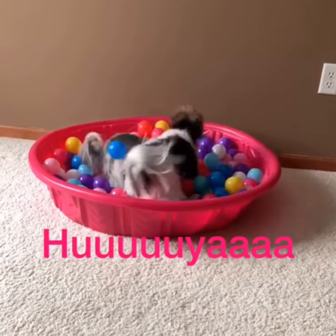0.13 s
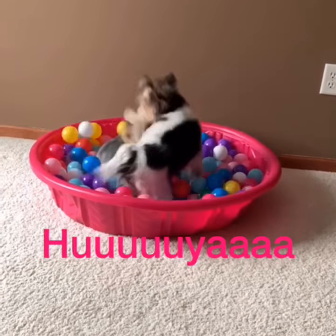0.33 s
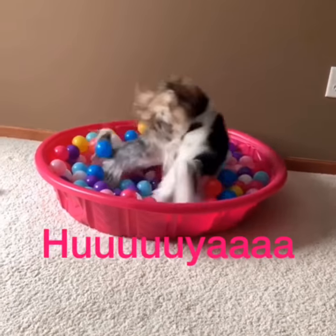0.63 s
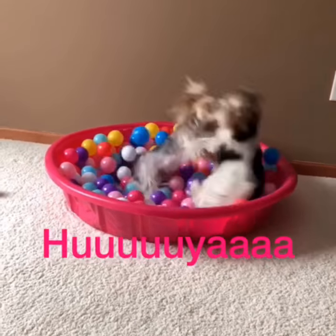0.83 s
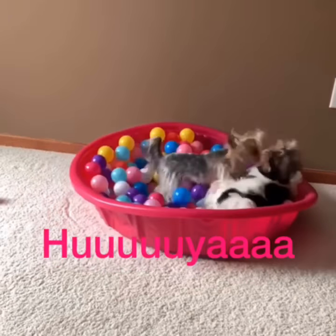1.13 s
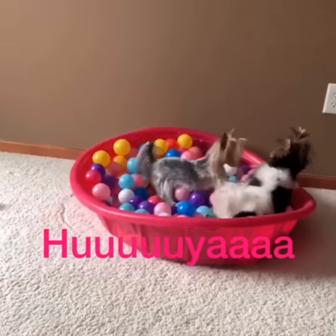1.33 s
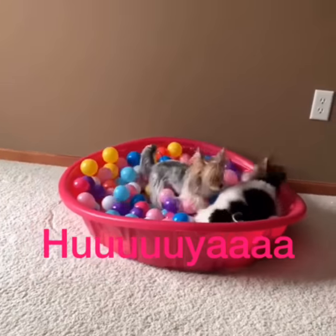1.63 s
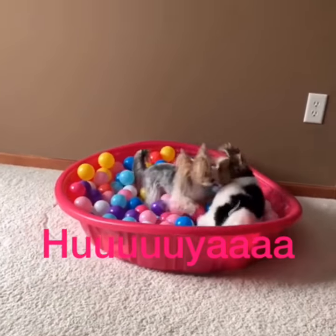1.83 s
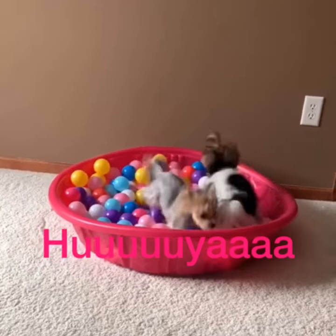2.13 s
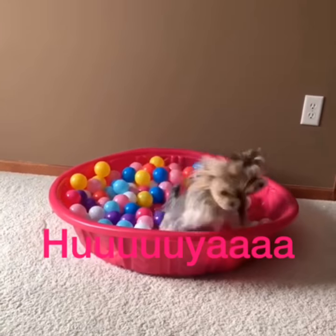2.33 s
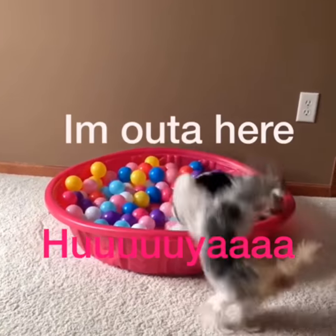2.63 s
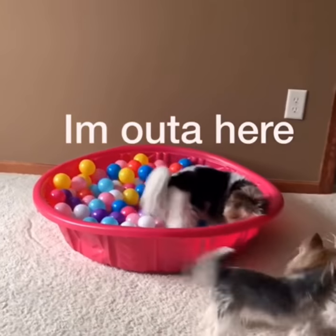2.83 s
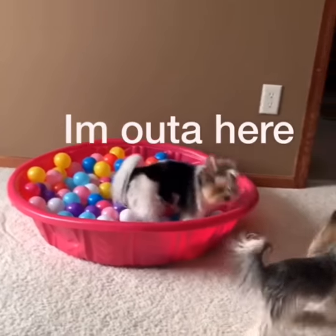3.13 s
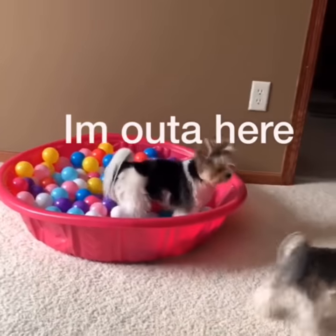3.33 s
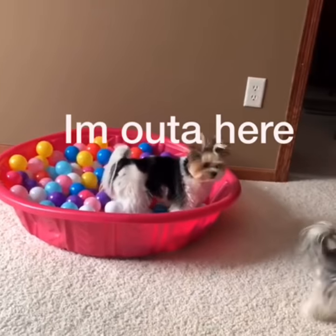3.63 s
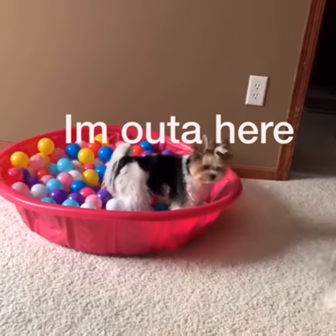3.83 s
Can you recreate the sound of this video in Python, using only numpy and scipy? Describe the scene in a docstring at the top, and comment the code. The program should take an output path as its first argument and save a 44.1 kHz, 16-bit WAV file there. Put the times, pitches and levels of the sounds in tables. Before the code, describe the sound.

Hollow plastic balls clatter and drum in a thin plastic tub as two small dogs wrestle.

```python
"""Two small dogs in a ball pool

Two small dogs wrestle in a thin plastic paddling pool full of hollow plastic balls, in a carpeted room.
Shoved balls drum on the tub, clatter, roll and rustle: many random contacts set resonators ringing.
Thumps and single ball knocks are short dying tones; claw cracks and a dog's wheeze are shaped noise.
One dog jumps out and the balls settle, and quiet background noise remains."""
import sys
import numpy as np
from scipy import signal
from scipy.fft import rfft, irfft
from scipy.io import wavfile

SR = 44100
rng = np.random.default_rng(int(sys.argv[2]) if len(sys.argv) > 2 else 0)


def unload_wav(signal):
    """Save mono or channel-first audio to the path in sys.argv[1] as 16-bit WAV at rate SR, clipped to [-1, 1]."""
    wavfile.write(
        sys.argv[1],
        SR,
        np.round(np.clip(np.atleast_2d(signal).T, -1, 1) * 32767).astype(np.int16),
    )


N = 176400   # length of the sound, in samples


def amp(db):
    """Turn decibels into a plain multiplier."""
    return 10 ** (np.asarray(db) / 20)


def rms_one(x):
    """Scale a signal to an average (rms) level of 1."""
    return x / np.sqrt(np.mean(x ** 2) + 1e-20)


def in_time(rows):
    """Join the rows of a timed table with straight lines, one curve per column."""
    s, *columns = np.transpose(rows)
    return [np.interp(np.arange(N) / SR, s, c) for c in columns]


def at_hz(points, hz):
    """Read a spectrum table at any frequency."""
    table_hz, table_db = np.array(points).T
    return np.interp(np.log(hz), np.log(table_hz), table_db)


def drift(rate_hz):
    """Smooth random wandering of spread 1, mostly slower than the given rate."""
    r = np.exp(-80 * np.pi * rate_hz / SR)
    # worked out at every 40th sample; the first 2000 values let the filter settle
    noise = rng.standard_normal(N // 40 + 2002)
    slow = signal.lfilter([1], [1, -2 * r, r * r], noise)[2000:]
    return np.interp(np.arange(N) / 40, np.arange(len(slow)), rms_one(slow))


def ring(clicks, hz, t60):
    """Each unit click sets a sine ringing, which falls by 60 dB in t60 seconds."""
    r = 10 ** (-3 / (t60 * SR))
    w = 2 * np.pi * hz / SR
    return signal.lfilter([0, np.sin(w)], [1, -2 * r * np.cos(w), r * r], clicks + 1e-18)


def coloured(spectrum):
    """Noise with the given spectrum, rms 1."""
    hz = np.maximum(np.arange(N // 2 + 1) * SR / N, 1)
    return rms_one(irfft(rfft(rng.standard_normal(N)) * amp(at_hz(spectrum, hz)), N))


def narrow_noise(hz, width_hz):
    """Noise band round a centre that may move; rms 1."""
    low_pass = signal.butter(2, width_hz / 2, fs=SR, output="sos")
    slow = signal.sosfilt(low_pass, rng.standard_normal((2, N)))
    phase = 2 * np.pi * np.cumsum(hz * np.ones(N)) / SR
    return rms_one(slow[0] * np.cos(phase) + slow[1] * np.sin(phase))


def collisions(spectrum, low_hz, high_hz, per_s, cycles, uneven_db, surge_db, count):
    """Random, uneven, soft contacts dealt out to resonators spread from low to high; rms 1."""
    sizes = amp(uneven_db * np.minimum(rng.exponential(1, N), 5)) * rng.choice([-1, 1], N)
    happens = rng.random(N) < per_s / SR
    clicks = sizes * happens * amp(surge_db * drift(5.1))
    dealt = rng.integers(0, count, N)
    total = np.zeros(N)
    for k, hz in enumerate(np.geomspace(low_hz, high_hz, count)):
        # ringing twice makes each contact start softly
        soft = ring(clicks * (dealt == k), hz, cycles / hz)
        tone = rms_one(ring(soft, hz, cycles / hz / 2))
        # sqrt(hz): higher resonators each cover a wider band
        total += amp(at_hz(spectrum, hz)) * np.sqrt(hz) * tone
    return rms_one(total)


def strike(out, s, sound):
    """Add a sound at a time in seconds."""
    return out + np.pad(sound, (int(s * SR), N))[:N]


# How hard the balls are churned:
# (time [s], tub drumming level [dB], ball clatter level [dB], ball rolling level [dB], rustle level [dB])
CHURN = [(0.0, -27, -34.5, -46, -49), (0.07, -21, -35, -48.5, -50.5), (0.17, -28.5, -44.5, -54.5, -56.5),
         (0.24, -31.5, -41.5, -48, -47.5), (0.32, -25, -34.5, -47, -48.5), (0.41, -21, -37.5, -47, -52.5),
         (0.56, -26, -33.5, -44.5, -47.5), (0.62, -29, -42, -44, -48.5), (0.67, -30.5, -42, -56, -59.5),
         (0.71, -38.5, -40.5, -51.5, -54), (0.8, -31, -49.5, -55.5, -57), (0.87, -20.5, -33, -44, -45.5),
         (0.97, -20, -35.5, -44, -47.5), (1.04, -24, -38.5, -44.5, -54), (1.12, -23.5, -38, -45.5, -50),
         (1.23, -34, -43.5, -51, -56.5), (1.38, -32, -47.5, -57.5, -64), (1.41, -44.5, -53.5, -50.5, -56),
         (1.46, -31, -40.5, -46, -55), (1.62, -32, -42, -51, -54.5), (1.82, -39, -52.5, -58, -61),
         (1.87, -39, -43, -40.5, -46.5), (1.9, -27, -42.5, -49, -55), (1.97, -39.5, -51, -55.5, -58.5),
         (2.09, -43, -53, -55.5, -62), (2.17, -37, -40.5, -48, -54), (2.23, -28.5, -43, -54, -53.5),
         (2.3, -28.5, -38, -48.5, -48.5), (2.42, -30.5, -50.5, -50, -54.5), (2.45, -29, -37, -47, -52.5),
         (2.56, -29.5, -42, -53.5, -55.5), (2.59, -23, -37, -49.5, -53), (2.66, -38, -57.5, -56, -67),
         (2.74, -35, -47, -55.5, -59.5), (2.85, -37, -50, -57.5, -63), (2.97, -49, -61.5, -66.5, -71.5),
         (3.18, -53.5, -65, -69, -80), (3.27, -57.5, -69, -70, -77.5), (3.33, -53, -77, -69.5, -83),
         (3.45, -76.5, -88, -79, -78), (3.64, -67, -81, -74, -74.5), (3.67, -54.5, -76, -72.5, -78.5),
         (3.8, -80, -94.5, -82, -84.5), (3.9, -76.5, -85.5, -78.5, -79.5), (3.97, -89, -87, -84, -81)]


def churn_levels():
    """The wrestling drives four sounds of the pool, each with its own level curve."""
    return in_time(CHURN)


# Response of the tub: (frequency [Hz], relative level per Hz [dB])
TUB_RESPONSE = [(32, -44), (55, -26), (113, 1), (178, -2), (239, 1.5), (386, -4), (427, -11), (489, -7),
                (585, -16.5), (800, -21), (1040, -50), (1760, -120)]


def tub_drumming(level_db):
    """Shoved balls hit the thin tub, which answers with low, short rings."""
    return amp(level_db) * collisions(TUB_RESPONSE, 63.6, 715, per_s=700, cycles=14.6,
                                      uneven_db=1.5, surge_db=.5, count=20)


# Spread of ball resonances: (frequency [Hz], relative level per Hz [dB])
BALL_RESONANCES = [(350, -31), (600, -2), (943, 0.5), (1240, 1.5), (1580, -4), (1690, 0.5), (2400, -19),
                   (3120, -43), (5280, -120)]


def ball_clatter(level_db):
    """Hollow balls knock together and their shells ring in the middle range."""
    return amp(level_db) * collisions(BALL_RESONANCES, 621, 2284, per_s=2500, cycles=20,
                                      uneven_db=2.8, surge_db=1.2, count=26)


# Colour of the rolling: (frequency [Hz], relative level per Hz [dB])
ROLLING_COLOUR = [(1120, -32), (1900, -9.5), (2200, -2.5), (2770, -7.5), (3760, -9), (4800, -16),
                  (6240, -52), (10600, -120)]


def ball_rolling(level_db):
    """Rolling balls make many nearly even contacts, higher than the clatter."""
    return amp(level_db) * collisions(ROLLING_COLOUR, 1910, 4510, per_s=1600, cycles=35.7,
                                      uneven_db=0.5, surge_db=2.04, count=12)


# Colour of the rustle: (frequency [Hz], relative level per Hz [dB])
RUSTLE_COLOUR = [(3060, -38), (5200, -0.5), (7300, 4.5), (10400, 1.5), (11400, -19), (11600, -65),
                 (13500, -13), (15800, 9)]


def rustle(level_db):
    """Shells and fur rub in thousands of tiny, high contacts a second."""
    return amp(level_db) * collisions(RUSTLE_COLOUR, 5500, 15400, per_s=8900, cycles=55,
                                      uneven_db=2.5, surge_db=1.2, count=22)


# Bodies and paws thump the tub: (time [s], peak level [dB], pitch [Hz])
THUMPS = [(0.041, -24, 125), (0.302, -15.5, 256), (0.559, -14.5, 213), (0.8, -18.5, 255), (1.01, -14, 242),
          (1.356, -25, 277), (1.453, -25, 336), (1.539, -43, 219), (1.902, -25, 107), (2.158, -19, 297),
          (2.603, -17, 222), (2.648, -21.5, 299), (2.826, -35.5, 148), (2.94, -39, 62), (3.036, -42.5, 117),
          (3.2, -54, 60), (3.305, -40, 317), (3.337, -46, 313), (3.36, -55, 54.7), (3.69, -52.5, 251),
          (3.751, -54, 239), (3.87, -63, 241)]


def thumps():
    """A soft blow makes a low tone that swells quickly and dies within a few cycles."""
    fall_cycles, rise_cycles = 8.1, 1.4   # to fall by 60 dB; time constant of the rise
    out, t = np.zeros(N), np.arange(SR // 4) / SR
    for s, db, hz in THUMPS:
        shape = amp(-60 * t * hz / fall_cycles) * (1 - np.exp(-t * hz / rise_cycles))
        out = strike(out, s, amp(db) * shape / shape.max() * np.sin(2 * np.pi * hz * t))
    return out


# Single balls knock: (time [s], peak level [dB], pitch [Hz], time for the scuff to fall by 60 dB [s])
BALL_KNOCKS = [(.064, -27, 632, 0.068), (.137, -46, 1540, .02), (0.168, -25, 1205, 0.012),
               (.222, -28, 1320, 0.019), (.469, -22, 552, 0.043), (.489, -23.5, 824, 0.059),
               (.49, -22.5, 2030, 0.021), (0.633, -34, 1790, .04), (0.689, -23, 1090, 0.065),
               (0.704, -32, 1470, 0.033), (.727, -20, 1136, 0.014), (.76, -33, 1230, .02),
               (0.843, -27, 970, .03), (.877, -21, 1210, 0.0081), (1.006, -22, 1474, 0.055),
               (1.019, -20.5, 4560, 0.018), (1.068, -35, 550, 0.022), (1.291, -28, 644, 0.007),
               (1.358, -33.5, 694, 0.027), (1.437, -39, 556, .03), (1.508, -28.5, 595, 0.015),
               (1.657, -32, 503, .03), (1.847, -38, 1350, 0.039), (1.887, -32.5, 523, 0.023),
               (2.113, -41, 1210, 0.037), (2.139, -35.5, 2150, .02), (2.157, -37, 960, 0.025),
               (2.19, -29, 1750, .015), (2.192, -38.5, 970, 0.013), (2.249, -37, 1250, .04),
               (2.314, -26, 1210, 0.035), (2.438, -32, 1270, .04), (2.514, -25.5, 2200, .01),
               (2.584, -31, 1290, .03), (2.707, -44, 574, 0.036), (2.745, -33, 930, 0.07),
               (2.826, -37, 590, .04), (2.828, -32, 1830, 0.011), (2.886, -39.5, 548, 0.03),
               (3.035, -47, 1640, .02), (3.054, -56, 606, 0.021), (3.138, -46.5, 1310, 0.042),
               (3.193, -46, 537, 0.028), (3.23, -54, 1140, 0.027), (3.301, -48, 1340, 0.047),
               (3.306, -42, 561, .03), (3.308, -49, 800, 0.034), (3.34, -47, 500, 0.052),
               (3.667, -45.5, 486, 0.074), (3.668, -53.5, 1100, 0.089), (3.672, -59.5, 1380, 0.07),
               (3.699, -58, 1080, .06)]
# Ways a ball rings: (multiple of the pitch, level [dB])
KNOCK_MODES = [(1, 0), (1.23, -10), (1.47, -11), (1.9, -15)]


def ball_knocks():
    """A click and a brief scuff of the shell set a few modes of one ball ringing."""
    ring_cycles, scuff_share = 32, .1
    contact_softness = 1.4   # upper limit of the contact, as a multiple of the pitch
    out, t = np.zeros(N), np.arange(SR // 4) / SR
    for s, db, hz, scuff_t60 in BALL_KNOCKS:
        scuff = rng.standard_normal(len(t)) * amp(-60 * t / scuff_t60)
        push = (t == 0) + scuff_share * scuff
        band = signal.butter(2, [hz / 2, hz * contact_softness], "band", fs=SR, output="sos")
        push = signal.sosfilt(band, push)
        tone = sum(amp(mode_db) * ring(push, hz * k, ring_cycles / (hz * k)) for k, mode_db in KNOCK_MODES)
        out = strike(out, s, amp(db) * tone / np.abs(tone).max())
    return out


# Hissy cracks, claws on plastic: (time [s], snap level before filtering [dB], hiss level [dB],
# time for the hiss to rise by 20 dB [s], time for it to fall by 60 dB [s])
CRACKS = [(0.209, -58, -45.5, 0.013, 0.1), (.575, -50, -40.5, 0.017, 0.23), (.844, -36, -48.5, 0.01, .24),
          (1.0032, -9, -36, .01, 0.11), (1.014, -29.5, -42, 0.0066, 0.2), (1.021, -40, -45, .006, 0.22),
          (1.441, -32, -36, 0.022, 0.17), (1.848, -35, -34.5, 0.012, 0.12),
          (2.113, -51, -54.5, .0052, 0.26), (2.15, -50, -45, 0.037, 0.14), (2.47, -78, -48, .02, .1),
          (2.581, -47.5, -53.5, 0.0082, 0.11), (2.827, -60.5, -62, 0.0064, 0.11),
          (3.03, -68.5, -69, 0.0092, .1), (3.229, -69.5, -72.5, 0.0054, 0.14)]
# Colour of the hiss: (frequency [Hz], relative level per Hz [dB])
CRACK_HISS = [(2000, -8.5), (3300, -10.5), (4400, -1.5), (5200, -7.5), (7000, 1), (9800, -1.5),
              (11200, -12), (11900, -43), (13500, -15), (15500, -5)]


def claw_cracks():
    """A snap with one quick echo, inside a hiss of tiny contacts that swells up to it and dies."""
    snap_t60_s, echo_s, echo_db = .007, .0023, -7
    snap_low_hz, snap_tilt = 4100, .55   # tilt: 0 flat, 1 rising with frequency
    snap_level, hiss_level, t = np.zeros(N), np.zeros(N), np.arange(N) / SR
    for s, snap_db, hiss_db, rise_s, t60 in CRACKS:
        for late, loss_db in ((0, 0), (echo_s, echo_db)):
            since = t - s - late
            snap_level += (t >= s + late) * amp(snap_db + loss_db - 60 * np.maximum(since, 0) / snap_t60_s)
        fall_db = 60 * np.maximum(t - s, 0) / t60
        before_db = 20 * np.maximum(s - t, 0) / rise_s
        hiss_level += amp(hiss_db - fall_db - before_db)
    high_pass = signal.butter(6, snap_low_hz, "high", fs=SR, output="sos")
    bright = signal.lfilter([1, -snap_tilt], 1, rng.standard_normal(N))
    snaps = signal.sosfilt(high_pass, snap_level * bright)
    contacts = collisions(CRACK_HISS, 2200, 15500, per_s=5300, cycles=37,
                          uneven_db=0.5, surge_db=0, count=30)
    return snaps + hiss_level * contacts


# A dog's wheeze: (time [s], centre frequency [Hz], level [dB])
WHEEZE = [(0, 1200, -48), (.03, 1300, -45), (.07, 1540, -39), (.145, 1580, -37), (.158, 1350, -44),
          (.172, 1240, -34), (.2, 1300, -38), (.25, 1396, -37), (.29, 1520, -36), (.33, 1430, -38),
          (.37, 1400, -60), (.49, 1189, -55), (.52, 1222, -37), (.56, 1290, -40), (.6, 1280, -60),
          (.68, 1500, -60), (.695, 1520, -38), (.72, 1440, -39), (.75, 1300, -44), (.78, 1250, -60)]


def wheeze():
    """Breath through a narrow, moving resonance, with a fast unevenness."""
    hz, db = in_time(WHEEZE)
    breathing = np.arange(N) / SR < WHEEZE[-1][0]
    rasp_db = 2.5 * drift(35)
    return amp(db + rasp_db) * narrow_noise(hz, width_hz=170) * breathing


# Faint narrow noise bands, mostly near the end:
# (frequency [Hz], width [Hz], start time [s], peak time [s], end time [s], level [dB])
FAINT_BANDS = [(7200, 300, 3.3, 3.62, 3.84, -78), (2480, 120, 3.36, 3.5, 3.57, -76),
               (2230, 100, 3.32, 3.37, 3.45, -77), (4000, 90, 2.9, 3.1, 3.4, -79),
               (4400, 200, 3.5, 3.58, 3.72, -81), (3900, 120, 3.55, 3.65, 3.75, -82),
               (2800, 150, 3.55, 3.7, 3.76, -79), (9200, 1500, 3.52, 3.6, 3.72, -80)]


def faint_noise_bands():
    """Faint narrow bands of noise, mostly near the end, swell, flicker and fade."""
    out, t = np.zeros(N), np.arange(N) / SR
    for hz, width_hz, start, peak, end, db in FAINT_BANDS:
        swell = np.interp(t, [start, peak, end], [0, 1, 0])
        flicker_db = 1.5 * drift(15)
        out += amp(db + flicker_db) * swell * narrow_noise(hz, width_hz)
    return out


# Floor rumble: (frequency [Hz], relative level per Hz [dB])
RUMBLE = [(12, -30), (22, -8), (40, -3), (52, -5), (66, 3), (85, -4), (130, -40)]


def floor_rumble(tub_db):
    """Deep noise that follows the drumming, with smaller swings in level."""
    follows, offset_db = .55, -52.5   # share of the drumming's decibels; added to that share
    return amp(follows * tub_db + offset_db) * coloured(RUMBLE)


# Steady background noise: (frequency [Hz], relative level per Hz [dB])
BACKGROUND = [(15, -30.5), (25, 7), (53, 6.5), (87, -9), (256, -12), (624, -51.5), (4140, -31.5),
              (5430, -38), (9070, -38), (16000, -64)]


def background():
    """Quiet, steady noise under everything."""
    return amp(-65.5) * coloured(BACKGROUND)


def room(x):
    """Reverberation as a dull, dying noise tail."""
    t60_s, gap_s, wall_cut_hz = 0.4, .006, 11500
    t = np.arange(SR // 2) / SR
    tail = rng.standard_normal(len(t)) * amp(-60 * t / t60_s) * (t > gap_s)
    tail = signal.sosfilt(signal.butter(1, wall_cut_hz, fs=SR, output="sos"), tail)
    return signal.fftconvolve(x, tail / np.sqrt(np.sum(tail ** 2)))[:N]


def scene():
    """Mix the pool, the dogs, their reverberation and the background."""
    tub_db, ball_db, roll_db, rustle_db = churn_levels()
    churning = tub_drumming(tub_db) + ball_clatter(ball_db) + ball_rolling(roll_db) + rustle(rustle_db)
    shared_surge = amp(-0.01 * drift(21))   # a tiny swell common to all churning
    pool = shared_surge * churning + thumps() + ball_knocks() + wheeze()
    claws = claw_cracks()
    echoes = room(amp(-9.5) * pool + amp(-14) * claws)
    mix = pool + claws + echoes + faint_noise_bands() + floor_rumble(tub_db) + background()
    return mix[None]


def record(dry):
    """The top is cut; the sound fades out quickly just before the end."""
    end_s, fade_s, cutoff_hz = 3.985, 0.0051, 16300
    fade = np.clip((end_s - np.arange(N) / SR) / fade_s, 0, 1)
    low_pass = signal.cheby2(12, 70, cutoff_hz, fs=SR, output="sos")
    return fade * signal.sosfilt(low_pass, dry)


dry = scene()
out = record(dry)
unload_wav(out)
```